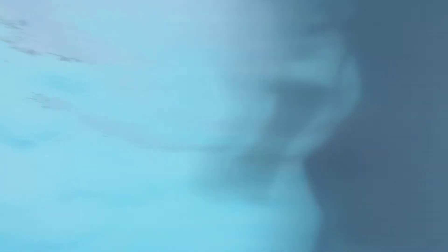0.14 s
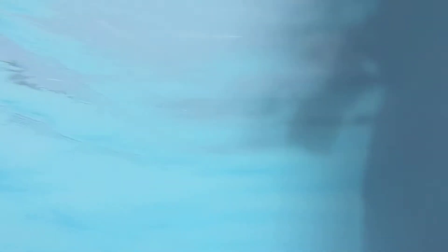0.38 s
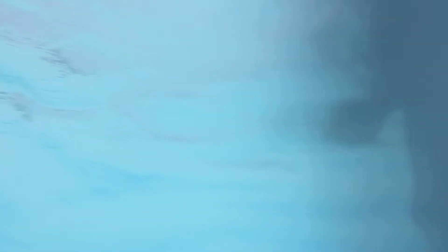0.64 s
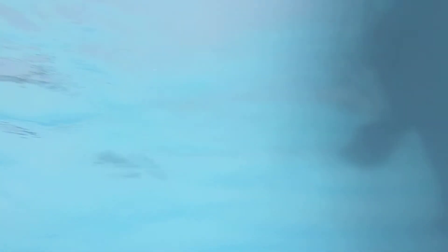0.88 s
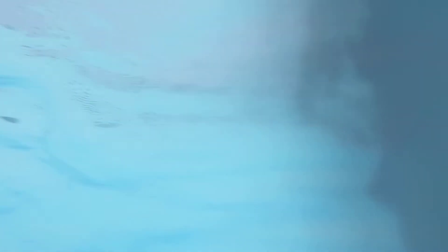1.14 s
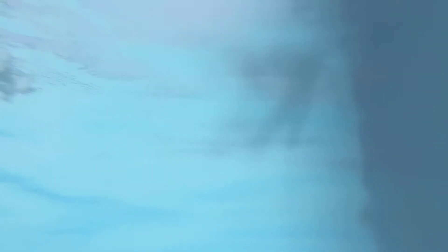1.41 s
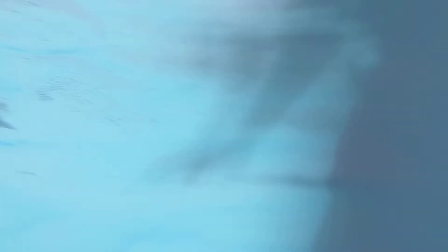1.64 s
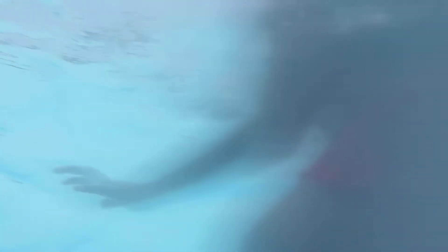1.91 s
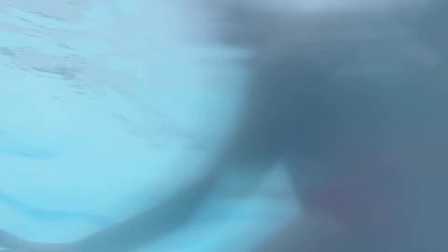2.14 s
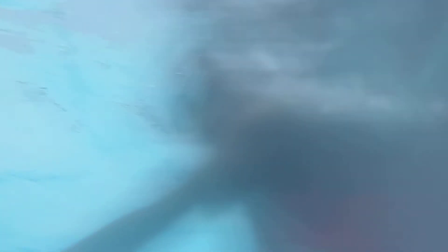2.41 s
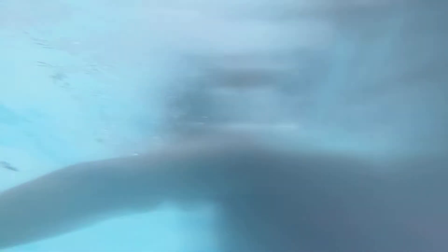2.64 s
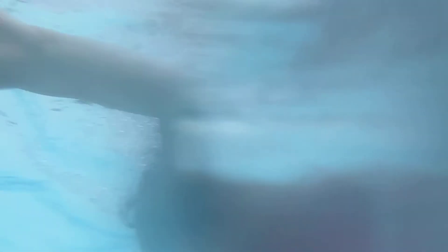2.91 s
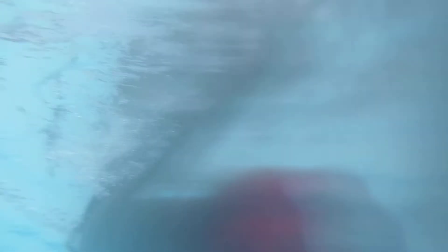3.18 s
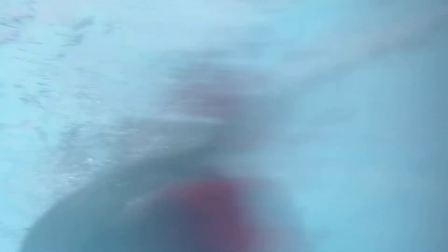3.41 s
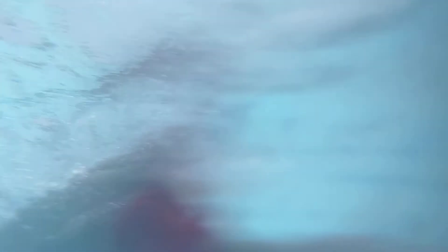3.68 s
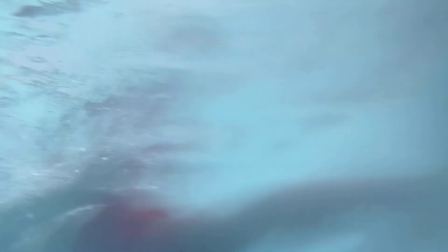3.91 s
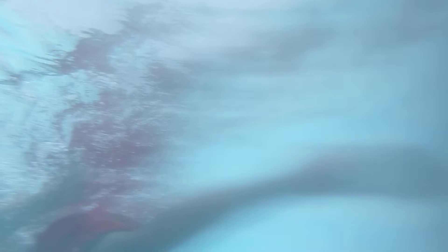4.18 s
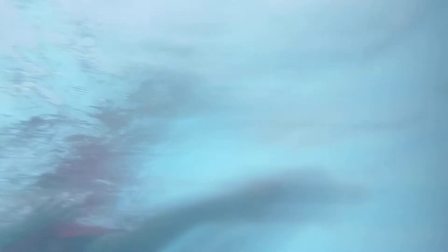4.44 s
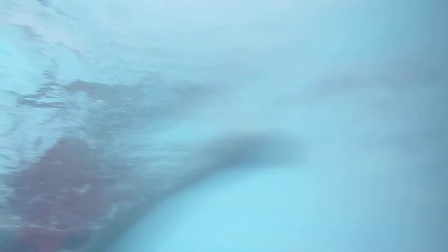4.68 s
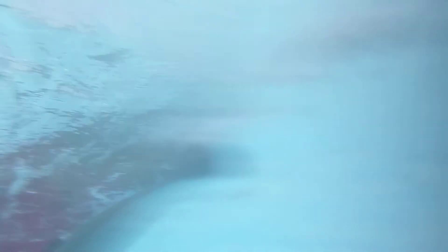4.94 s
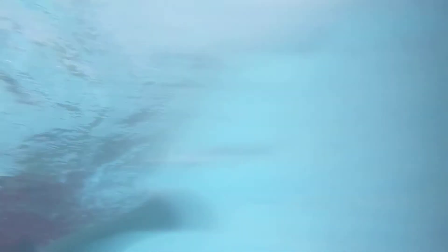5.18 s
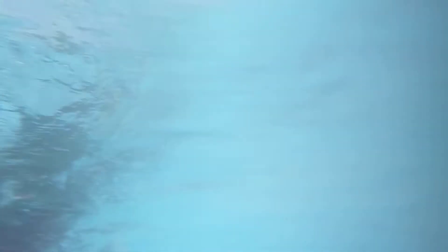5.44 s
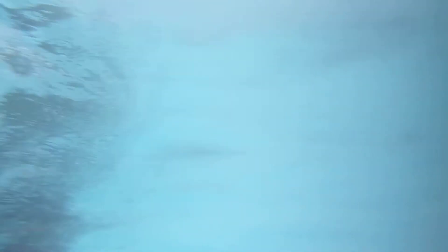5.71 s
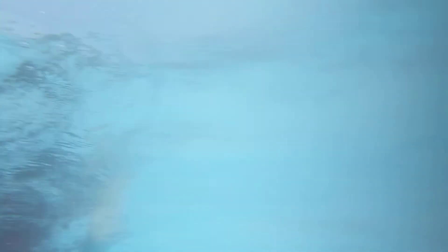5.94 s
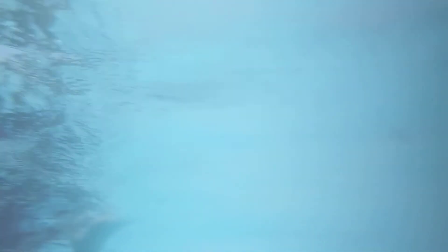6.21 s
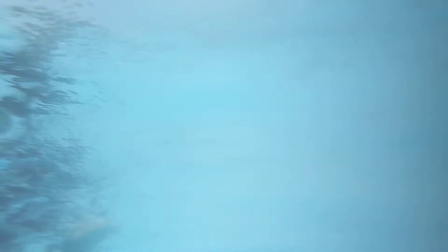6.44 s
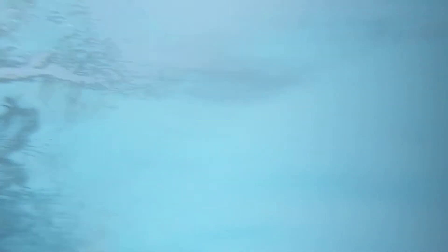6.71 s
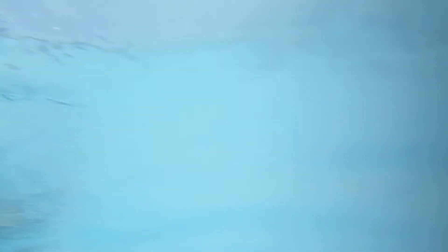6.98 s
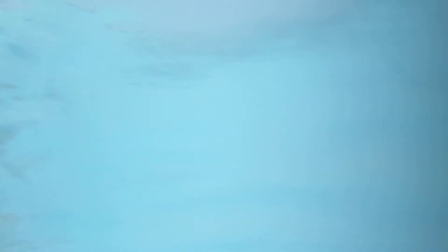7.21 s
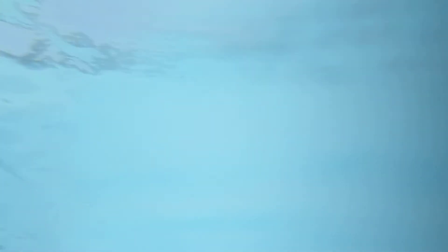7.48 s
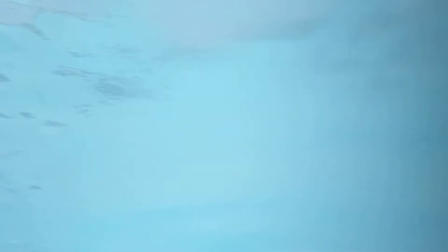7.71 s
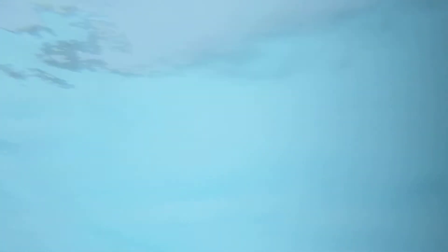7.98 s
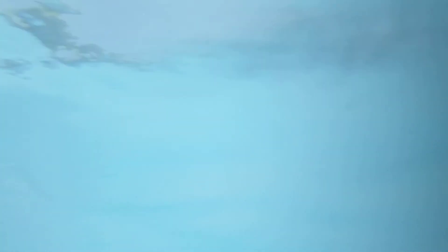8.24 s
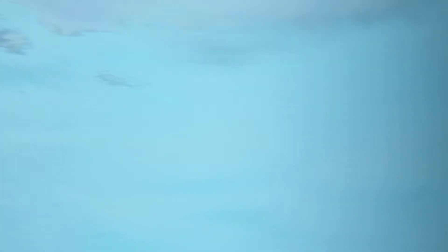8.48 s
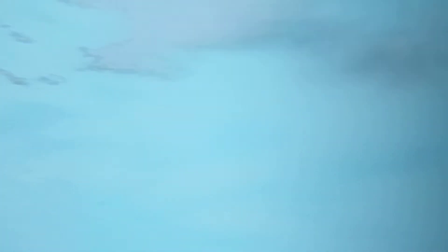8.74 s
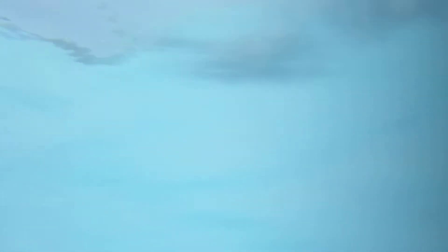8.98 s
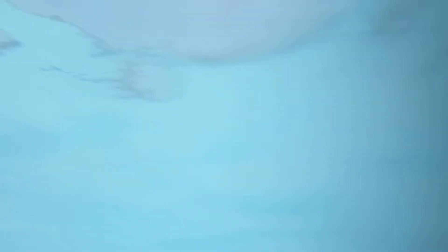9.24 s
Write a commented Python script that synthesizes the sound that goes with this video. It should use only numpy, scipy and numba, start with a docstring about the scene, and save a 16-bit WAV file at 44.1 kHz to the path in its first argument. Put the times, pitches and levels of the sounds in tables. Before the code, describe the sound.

Close underwater sound in a pool, through a small hollow case. A strong bass pump drone throbs about three times a second over a low water rush. Hard hollow knocks and two sharp snaps come early, then muffled thumps and bubbling as a swimmer passes. Later, gurgles and soft splashing surges swell, with a heavy thump near seven seconds and another knock near eight and a half.

```python
"""A filter pump drones through the walls of a pool, its shaft tones beating against mains tones.
A swimmer stirs up surges (shaped noise), bubbles and splashes (damped tones and noise).
A small camera in a hollow case lies under water; the case creaks, knocks and snaps (short pushes).
Bubbles and knocks reach the two microphones through the resonances of the case; bass and the
finest spray bypass them."""
import sys
import numpy as np
from scipy import signal
from scipy.fft import rfft, irfft
from scipy.io import wavfile
from scipy.ndimage import uniform_filter1d
from numba import njit

SR = 44100
rng = np.random.default_rng(int(sys.argv[2]) if len(sys.argv) > 2 else 0)


def dump_mix(stems):
    """Bounce the given channels to the path in sys.argv[1] as a 16-bit WAV at rate SR."""
    frames = np.atleast_2d(stems).T  # one column per channel
    limited = np.clip(frames, -1, 1)  # hard clip at full scale
    pcm = np.round(limited * 32767).astype(np.int16)
    wavfile.write(sys.argv[1], SR, pcm)


def makeup_ratio(level_db):
    """Linear amplitude ratio for a level in decibels (20 dB per factor of ten)."""
    decades = np.asarray(level_db, float) / 20
    return 10 ** decades


N = 413216
T = np.arange(N) / SR
F = np.fft.rfftfreq(N, 1 / SR)

# bubbles stirred up by the swimmer: time_s, large_bubbles_db, small_bubbles_db
STIR = [(0, -46.5, -49), (.15, -61, -50), (1.3, -56, -52.5), (1.7, -58.5, -51), (2.15, -54.5, -47),
        (2.8, -47.5, -42), (3.3, -50, -48.5), (3.58, -48, -44), (3.68, -40.5, -44.5), (3.97, -42, -49),
        (4.1, -50, -44), (4.25, -50.5, -43), (4.75, -55, -46), (5.0, -55.5, -49.5), (5.5, -52.5, -49),
        (5.85, -61.5, -55), (6.5, -59.5, -47), (6.84, -49, -46), (7.0, -37.5, -49), (7.3, -41, -41.5),
        (7.6, -44.5, -42), (7.86, -52, -47.5), (8.06, -43, -47), (8.33, -49.5, -46.5), (8.6, -48, -45.5),
        (8.9, -41.5, -44), (9.37, -48.5, -48.5)]


def level(x, db):
    """Scale to an rms level."""
    return x * makeup_ratio(db) / np.sqrt(np.mean(x ** 2))


def walk(rate_hz):
    """Random values held 1 / rate_hz and slewed twice; spread near 1."""
    hold = int(SR / rate_hz)
    steps = np.repeat(rng.standard_normal(N // hold + 1), hold)
    return 1.25 * uniform_filter1d(uniform_filter1d(steps, hold), hold)[:N]


def curve(table):
    """Columns of a table as signals over time."""
    time_s, *columns = np.transpose(table)
    return [np.interp(T, time_s, column) for column in columns]


def band(x, low_hz, high_hz):
    """Band-pass."""
    return signal.sosfilt(signal.butter(2, [low_hz, high_hz], "bandpass", fs=SR, output="sos"), x)


@njit
def rings(start_s, size, pitch_hz, t60_s, glide_oct_per_s, rise_s):
    """Damped tones that swell with time constant rise_s and slide in pitch."""
    out = np.zeros(N)
    for s, a, hz, t60, glide, rise in zip(start_s, size, pitch_hz, t60_s, glide_oct_per_s, rise_s):
        first, phase = int(s * SR), 0.
        for i in range(min(int(.7 * t60 * SR), N - first)):
            t = i / SR
            phase += 2 * np.pi * hz * 2 ** (glide * t) / SR
            out[first + i] += a * (1 - np.exp(-t / rise)) * 1000 ** (-t / t60) * np.sin(phase)
    return out


def swarm(count, low_hz, high_hz, cycles, scatter_db, cluster_db):
    """Bubbles that come in clusters; each rings some cycles and rises in pitch."""
    when, pitch, size, ring = rng.random((count, 4)).T
    born = np.cumsum(makeup_ratio(cluster_db * walk(40)))
    start_s = np.interp(when, born / born[-1], T)
    hz = low_hz * (high_hz / low_hz) ** pitch
    t60_s = cycles * (.5 + ring) / hz
    strength = makeup_ratio(-scatter_db * np.log(1.02 - size))  # few large, many small
    return level(rings(start_s, strength, hz, t60_s, 0.3 / t60_s, 0.12 / hz), 0)


def swarms(channels, **settings):
    """Independent swarms of the same kind, one per channel."""
    return np.array([swarm(**settings) for _ in range(channels)])


def case(coupling, damping):
    """Case response at both microphones: steep modes, each a quarter turn behind the one below."""
    # modes of the case: pitch_hz, width_hz (of one of two stages, at damping 1)
    case_modes = [(340, 220), (620, 350), (810, 300), (1060, 330), (1300, 330), (1610, 330), (1930, 380),
                  (2370, 500), (3180, 500), (3900, 750), (4900, 1300), (6100, 1500)]
    out = 0
    for k, ((hz, width_hz), (left_db, right_db, right_sign)) in enumerate(zip(case_modes, coupling)):
        loss = 1j * F * width_hz * damping
        mode = loss / (hz ** 2 - F ** 2 + loss)
        sides = np.array([[makeup_ratio(left_db)], [np.sign(right_sign) * makeup_ratio(right_db)]])
        out = out + (-1j) ** k * mode ** 2 * sides
    return out


def pump():
    """Steady tones; the slipping shaft throbs against the mains three times a second."""
    shaft_hz, mains_hz, aligned_s = 58.515, 60.026, .026
    # shaft tones, the six vanes lift the sixth: multiple, level_db
    shaft = [(1, -32.8), (2, -32), (5, -68), (6, -62)]
    # mains tones: multiple, level_db
    mains = [(2, -28.5), (3, -49), (4, -53.5)]
    tones = [(shaft_hz * k, db) for k, db in shaft] + [(mains_hz * k, db) for k, db in mains]
    drone = 0
    for hz, db in tones:
        wander_rad = 0.14 * walk(2.6)
        tone = np.cos(2 * np.pi * hz * (T - aligned_s) + wander_rad)
        drone = drone + np.sqrt(2) * makeup_ratio(db + walk(2.79)) * tone
    return drone


def rush():
    """Low rush of moving water: shaped noise, lifted at the standing waves of the basin."""
    # noise spectrum, only the shape counts: pitch_hz, relative_db
    rumble = [(20, -29), (40, -4), (50, 0.5), (70, -0.5), (105, 6.5), (135, -0.5), (180, -8), (250, -23.5),
              (350, -28), (450, -32.5), (700, -63), (1500, -105)]
    # standing waves of the basin: pitch_hz, width_hz, lift_db
    pool = [(49.1, 0.8, 8.5), (70.96, 1.2, 10)]
    # moving water: time_s, level_db
    surge = [(0, -31.5), (3.6, -30), (5.45, -31.5), (6.6, -31.5), (7.25, -26), (8.6, -30.5), (9.1, -29.5),
             (9.37, -32)]
    hz, relative_db = np.transpose(rumble)
    colour_db = np.interp(np.log(F + 1), np.log(hz), relative_db)
    for wave_hz, width_hz, lift_db in pool:
        colour_db = colour_db + lift_db / (1 + (2 * (F - wave_hz) / width_hz) ** 2)
    noise = irfft(rfft(rng.standard_normal(N)) * makeup_ratio(colour_db), N)
    return level(noise, 0) * makeup_ratio(curve(surge)[0])


def glugs():
    """Glugs of trapped air: low ringing pockets that follow the large bubbles."""
    pockets = swarm(count=220, low_hz=143.0, high_hz=423.0, cycles=18., scatter_db=4.5, cluster_db=5.)
    return pockets * makeup_ratio(0.63 * curve(STIR)[0] - 24.)


def stirred_bubbles(wash, flicker):
    """Gurgle of large bubbles and fizz of small ones, over noise; splashes add rush, hiss and froth."""
    gurgle_db, fizz_db = curve(STIR)
    out = 0
    # one part common to both microphones, one independent in each
    for share_db, channels in ((1.5, 1), (0.24, 2)):
        large = swarms(channels, count=4500, low_hz=522.6, high_hz=1500., cycles=43.0,
                       scatter_db=5.5, cluster_db=3.)
        small = swarms(channels, count=6000, low_hz=1500., high_hz=6710.0, cycles=57.0,
                       scatter_db=7.0, cluster_db=4.5)
        froth = swarms(channels, count=7000, low_hz=2197.0, high_hz=5600.0, cycles=66.0,
                       scatter_db=5.5, cluster_db=4.)
        noise = rng.standard_normal((2, channels, N))
        low_noise = level(band(noise[0], 210.0, 1400.0), 0)
        hiss = level(band(noise[1], 2100.0, 4900.0), 0)
        gurgle = (large + makeup_ratio(-7.0) * low_noise) * makeup_ratio(gurgle_db + 2.0 * walk(18))
        gurgle = gurgle + makeup_ratio(-12.0) * wash * low_noise
        fizz = (small + makeup_ratio(-11.0) * hiss) * makeup_ratio(fizz_db + 2.52 * flicker)
        fizz = fizz + wash * (makeup_ratio(-7.5) * hiss + makeup_ratio(3.5) * froth)
        out = out + makeup_ratio(share_db) * (gurgle + fizz)
    return out


def spray(wash, flicker):
    """Finest droplets and ticks, too high to ring the case; partly shared between microphones."""
    low_hz, high_hz, pan_db = 6000., 14000., -4
    # treble: time_s, level_db
    spray_level = [(0.0, -69.5), (0.75, -65), (1.48, -71.5), (2.24, -63), (3.44, -70.5), (4.46, -66.5),
                   (5.4, -69.5), (6.0, -66), (6.26, -61.5), (6.6, -67), (7.75, -59.5), (9.37, -67)]
    quick = walk(70)
    drops = swarms(3, count=2000, low_hz=low_hz, high_hz=high_hz, cycles=30.,
                   scatter_db=11.5, cluster_db=3.5)
    fine = level(band(rng.standard_normal((3, N)), low_hz, high_hz), 0)
    mist = drops + makeup_ratio(-2.5 + 2.2 * quick) * fine
    x = mist * makeup_ratio(curve(spray_level)[0] + .8 * flicker) + makeup_ratio(-21.5) * wash * (fine + drops)
    x = x + band(ticks(), low_hz, high_hz)
    x = signal.lfilter([.4], [1, -.6], x[:2] + 0.52 * x[2])  # third channel is shared; dulled
    return x * makeup_ratio(np.array([[pan_db], [-pan_db]]) / 2)


def thumps():
    """Single thumps of pressure: surges and large air pockets as low damped tones."""
    # start_s, level_db, pitch_hz, t60_s, glide_oct_per_s
    thump_list = [(0.092, -14.5, 24.6, 0.61, 5), (1.843, -2, 131, 0.054, -9), (1.846, -18.5, 272, 0.092, 3),
                  (1.997, -8.5, 37.3, 0.17, -3), (2.278, -5.5, 116, 0.072, 5),
                  (2.33, -26.5, 315, 0.14, 2.5), (2.803, -5, 117, 0.091, -1), (3.192, -22.5, 161, 0.16, 6),
                  (3.853, -26, 349, 0.069, 3), (4.04, -32, 264.6, 0.077, -3.5),
                  (5.659, -19, 39.4, 0.29, -1), (6.291, -19, 40.7, 0.15, 0), (6.891, 1.5, 69.4, 0.054, 1),
                  (6.918, -4, 88.7, 0.31, -1), (6.983, -7, 78.7, 0.47, -4), (7.096, -12.5, 112.3, 0.31, -5),
                  (7.415, -17.5, 143.5, 0.18, 1), (7.805, -33, 342, 0.086, 2),
                  (8.052, -19, 156.7, 0.25, 2.5), (8.49, -4, 72.4, 0.096, -9), (8.497, -8, 145, 0.16, 4),
                  (8.952, -12.5, 76, 0.31, 2.5)]
    start_s, level_db, hz, t60_s, glide = np.transpose(thump_list)
    return rings(start_s, makeup_ratio(level_db), hz, t60_s, glide, 0.28 / hz)


def ticks():
    """Thin bright ticks: noise bursts that decay within milliseconds."""
    # start_s, level_db
    tick_list = [(0.345, -33), (1.0972, -39), (1.1715, -39), (1.2435, -38), (1.6142, -44), (1.647, -37),
                 (1.733, -38), (2.002, -34), (3.6067, -41), (3.822, -28), (4.4444, -38), (5.175, -35),
                 (5.3653, -35), (5.545, -34), (5.876, -44), (6.444, -31), (6.6164, -40), (7.5398, -40),
                 (7.5956, -42), (8.4612, -39), (8.492, -30), (8.9133, -36)]
    length = 176
    fade = np.exp(-np.arange(length) / 40.)
    out = np.zeros((3, N))
    for s, db in tick_list:
        first = int(s * SR)
        out[:, first:first + length] += makeup_ratio(db) * rng.standard_normal((3, length)) * fade
    return out


def clear_bubbles(gain):
    """Single bubbles, evened out for the case gain; three quieter neighbours beat against each."""
    # start_s, level_db, pitch_hz, t60_s
    bubbles = [(0.383, -35, 1500, 0.026), (0.97, -36, 1136, 0.039), (1.191, -28, 3840, 0.023),
               (2.35, -33, 830, 0.048), (2.507, -38, 1800, 0.026), (2.598, -34, 860, .05),
               (2.822, -32.5, 890, .035), (2.895, -33, 2320, .03), (2.943, -25, 3940, .02),
               (3.456, -31, 1002, 0.044), (3.582, -28.5, 920, 0.047), (3.673, -26, 796, 0.15),
               (3.722, -29, 770, .06), (3.738, -35, 1970, 0.043), (3.782, -28.5, 880, 0.1),
               (3.824, -34, 3230, 0.034), (3.855, -34, 804, .05), (4.036, -30, 2214, 0.039),
               (4.071, -34, 1830, 0.031), (4.125, -36, 1870, .035), (4.149, -30.5, 2000, 0.046),
               (4.265, -32.5, 1130, 0.058), (4.267, -31.5, 1900, .035), (4.425, -36.5, 2000, .035),
               (4.832, -32, 730, 0.028), (4.842, -34.5, 1970, 0.043), (4.922, -29.5, 1940, 0.033),
               (5.112, -29, 4940, 0.017), (5.148, -37.5, 2950, 0.033), (5.168, -34, 1975, 0.032),
               (5.245, -31.5, 2850, 0.029), (5.383, -32, 2420, 0.06), (5.467, -35, 1233, 0.056),
               (5.632, -38, 1050, 0.074), (5.726, -32.5, 3850, .02), (5.776, -37.5, 750, 0.054),
               (6.403, -36.5, 1135, 0.049), (6.732, -28, 3940, .02), (6.975, -28, 746, 0.031),
               (7.097, -33, 2780, 0.023), (7.417, -17.5, 800, 0.018), (7.551, -32, 817, 0.15),
               (7.557, -29.5, 3040, 0.019), (7.736, -28, 2890, 0.015), (7.846, -36.5, 605, 0.12),
               (7.878, -34.5, 1206, 0.048), (8.439, -25.5, 710, 0.025), (8.463, -17.5, 2600, 0.017),
               (8.488, -27.5, 790, 0.054)]
    start_s, db, hz, t60_s = np.transpose(bubbles)
    loud = np.interp(hz, F, np.abs(gain).mean(axis=0))
    glide = 0.11 / t60_s
    out = rings(start_s, makeup_ratio(db) / loud, hz, t60_s, glide, 1.2 / hz)
    for late, off, less in rng.random((3, 3, len(start_s))):
        near_hz = hz * (1 + .16 * (off - .5))
        size = makeup_ratio(db - 6.0 - 6. * less) / loud
        out = out + rings(start_s + 0.6 * t60_s * late, size, near_hz, t60_s, glide, 1.5 / hz)
    return out


def scatter(start_s, end_s, db):
    """Random small pushes, 500 a second, growing by 8 dB on average: start_s, level_db, push_ms."""
    chance = rng.random((int((end_s - start_s) * 500), 3))
    return [(start_s + (end_s - start_s) * a, db + 8. * a - 13.6 * b, 0.086 + 2.06 * c)
            for a, b, c in chance]


def creaks():
    """Creaks of the case: trains of small pushes."""
    # start_s, end_s, level_db
    creak_list = [(0.785, 0.861, -21.5), (2.053, 2.149, -30.5), (2.164, 2.189, -25), (6.859, 7.04, -31.5),
                  (8.478, 8.501, -32.5)]
    return [push for row in creak_list for push in scatter(*row)]


def knocks():
    """Single knocks on the case."""
    # start_s, level_db, push_ms
    knock_list = [(.799, -13.5, 0.85), (.83, -17, 0.48), (.842, -2.5, 0.61), (.851, -15, 0.71),
                  (1.277, -17.5, 0.64), (1.299, -15.5, 0.56), (1.338, -28.5, 1), (1.552, -8.5, 0.67),
                  (2.029, -22.5, 0.75), (2.07, -18, 0.92), (2.103, -14.5, 0.85), (2.127, -24, 0.91),
                  (2.138, -19, 1), (3.607, -16, .1), (3.641, -10, 0.36), (3.689, -14.5, 0.35),
                  (4.652, -12, .15), (5.30, -23, 0.28), (5.376, -24.5, 0.34), (6.817, -26, 0.18),
                  (6.925, -14.5, 0.21), (6.976, -10.5, 0.63), (7.826, -12, 0.059), (8.463, -5, 0.058),
                  (8.689, -19, 0.15)]
    return list(knock_list)


def snaps():
    """A joint of the case snaps and bounces, with loose rattle from just before until just after."""
    # start_s, level_db, push_ms
    snap_list = [(.873, 1.5, .22), (2.193, -1, 0.28)]
    # the snap itself and its bounces: delay_s, gain_db
    bounces = [(0, 3), (.0014, 3), (.0035, -7), (.0063, -1.5)]
    pushes = []
    for s, db, push_ms in snap_list:
        pushes += [(s + delay_s, db + gain_db, push_ms) for delay_s, gain_db in bounces]
        pushes += scatter(s - .005, s + .013, db - 21.5)
    return pushes


def struck_case():
    """Pushes load and release the case; a softer contact lasts longer and sounds duller."""
    # coupling of knocks per case mode: left_db, right_db, right_sign
    from_knock = [(0.5, -5.5, -1), (-0.5, -12, -1), (-1.5, -23.5, -1), (-0.5, 3.5, -1), (-1, -19, -1),
                  (-1, -10.5, -1), (-7.5, -2.5, 1), (1, -3, -1), (-4, -8.5, 1), (-35.5, -35.5, -1),
                  (-5.5, -4, 1), (-36.5, -33.5, 1)]
    force = np.zeros(N)
    for s, db, push_ms in creaks() + knocks() + snaps():
        # push, then equal release; three samples longer than twice push_ms
        turn = np.linspace(0, 2 * np.pi, int(push_ms * 2 * SR / 1000) + 3)
        first = int(s * SR)
        force[first:first + len(turn)] += makeup_ratio(db) * np.sin(turn) * np.sin(turn / 2)
    return irfft(rfft(force) * case(from_knock, 1.087), N)


def splashes():
    """Strength of the splash wash: every splash swells fast and dies away."""
    # start_s, level_db, rise_s, t60_s
    splash_list = [(4.054, -36, 0.015, 0.31), (4.649, -38, 0.0022, 0.31), (4.86, -37.5, 0.0033, 0.11),
                   (5.085, -46, 0.0031, 0.35), (6.125, -32, 0.05, 0.19), (6.65, -38.5, .01, 0.17),
                   (6.88, -33.5, 0.038, 0.6), (7.10, -34, 0.032, 0.59), (7.17, -33.5, 0.027, 0.46),
                   (7.80, -41, 0.0038, 0.49), (8.07, -31, 0.048, 0.52), (8.66, -45, 0.018, 1.3),
                   (8.9, -40, 0.041, 0.55)]
    wash = 0
    for s, db, rise_s, t60_s in splash_list:
        since = np.maximum(T - s, 0)
        wash = wash + makeup_ratio(db) * (1 - np.exp(-since / rise_s)) * 1000 ** (-since / t60_s)
    return wash


def water():
    """Stirred and clear bubbles and splashes rung through the case; spray on top."""
    # coupling of water sounds per case mode: left_db, right_db, right_sign
    from_water = [(-14.5, -12, 1), (-32.5, -19.5, -1), (-12.5, 0, 1), (-11, -8.5, 1), (-11, -32.5, 1),
                  (-33.5, -16, 1), (-9.5, -17, 1), (-10, -7, -1), (-5.5, -7, 1), (-9.5, -2.5, -1),
                  (-21.5, -4, -1), (-17.5, -10.5, 1)]
    wash = splashes() * makeup_ratio(2.2 * walk(22))
    flicker = walk(45)
    gain = case(from_water, 1.)
    bubbling = stirred_bubbles(wash, flicker) + clear_bubbles(gain)
    return irfft(rfft(bubbling) * gain, N) + spray(wash, flicker)


def scene():
    """Bass presses on both microphones nearly alike, a little later and stronger on the right."""
    right_lag_s = 0.00026
    bass = rfft(pump() + rush() + glugs() + thumps())
    # the right side falls further behind towards the lowest mode of the case
    behind_rad = 2 * np.pi * F * right_lag_s + 2.2 / (1 + (363.5 / (F + 1)) ** 8)
    sides = np.array([makeup_ratio(1.0) + 0 * F, makeup_ratio(1.5) * np.exp(-1j * behind_rad)])
    return irfft(bass * sides, N) + water() + struck_case()


def low_pass(x):
    """Removes everything above the highest recorded frequency."""
    return signal.sosfilt(signal.butter(12, 16510, fs=SR, output="sos"), x)


def record(dry):
    """Faint preamplifier hiss, soft clipping of the loudest peaks and a cut of the top."""
    hiss = signal.lfilter([1], [1, -.7], rng.standard_normal(dry.shape))
    x = dry + level(hiss, -73)
    x = x / (1 + (x / .74) ** 6) ** (1 / 6)
    x = signal.sosfilt(signal.ellip(8, .2, 60, 15600, fs=SR, output="sos"), x)
    return low_pass(x)


dry = scene()
out = record(dry)
dump_mix(out)
```